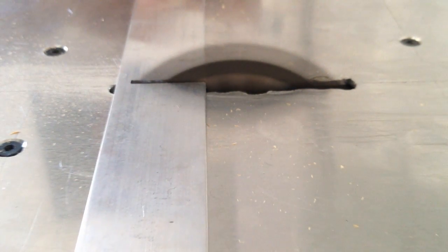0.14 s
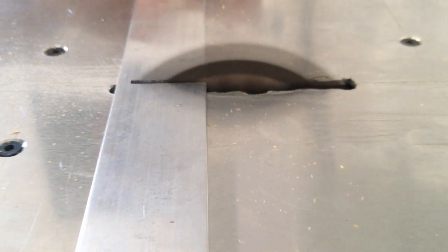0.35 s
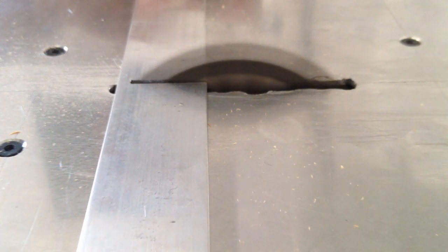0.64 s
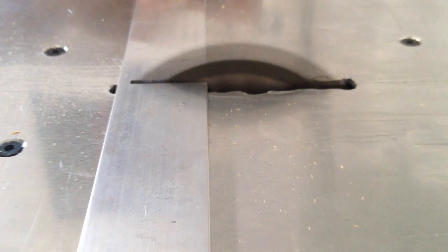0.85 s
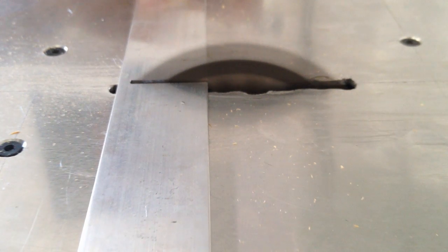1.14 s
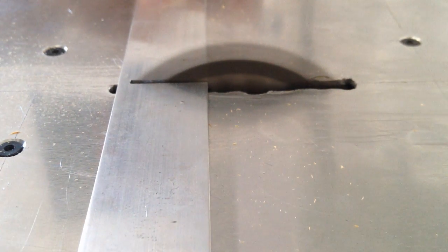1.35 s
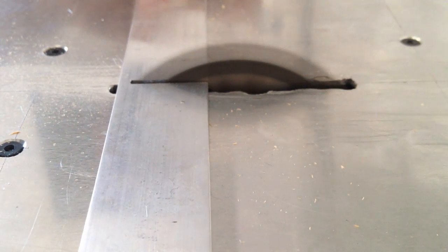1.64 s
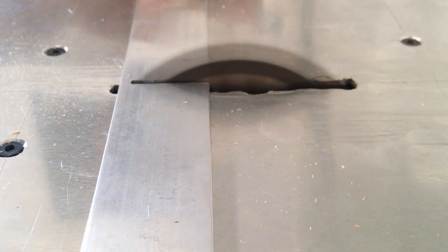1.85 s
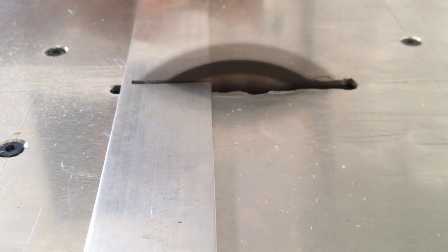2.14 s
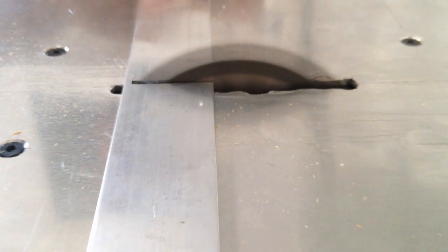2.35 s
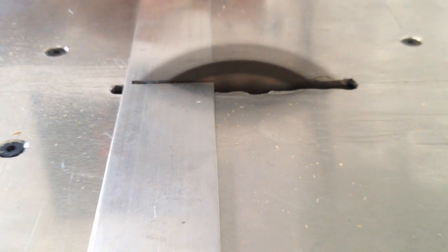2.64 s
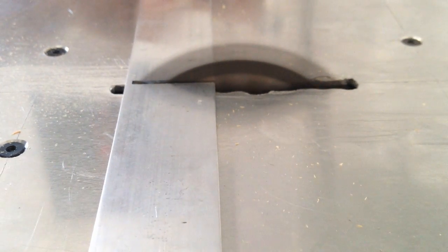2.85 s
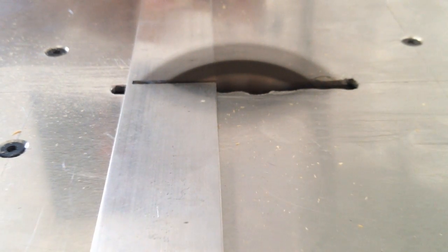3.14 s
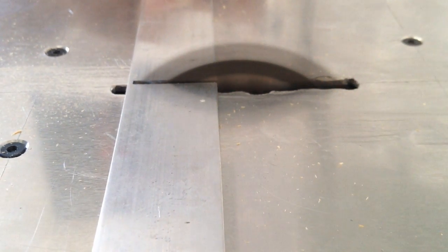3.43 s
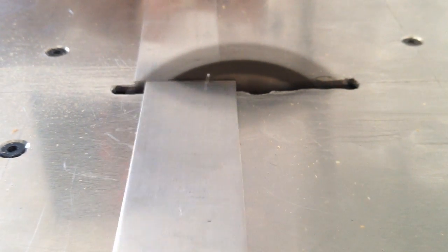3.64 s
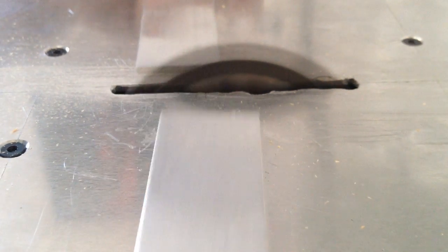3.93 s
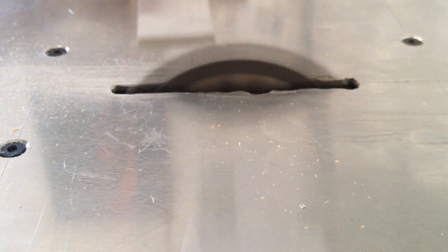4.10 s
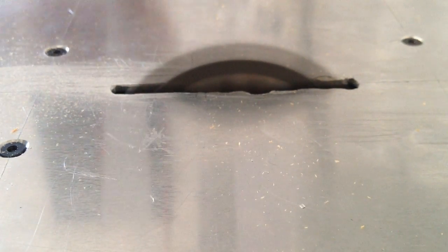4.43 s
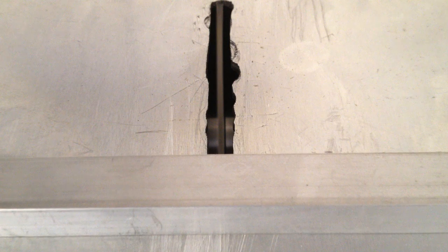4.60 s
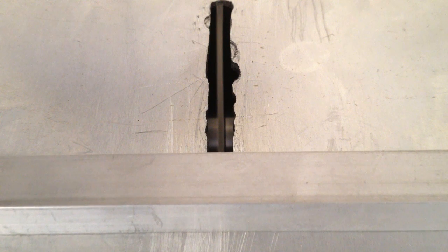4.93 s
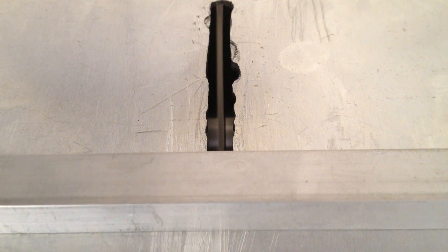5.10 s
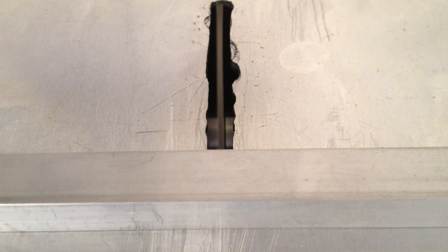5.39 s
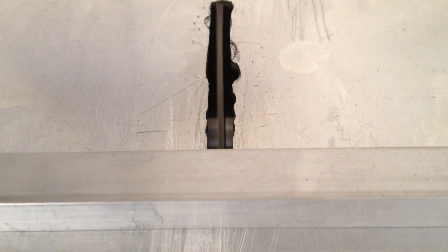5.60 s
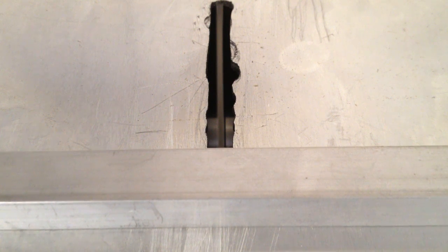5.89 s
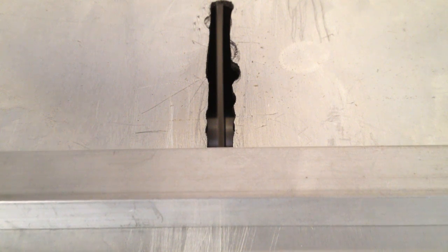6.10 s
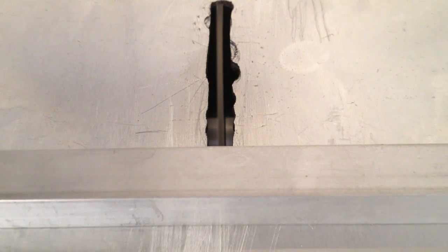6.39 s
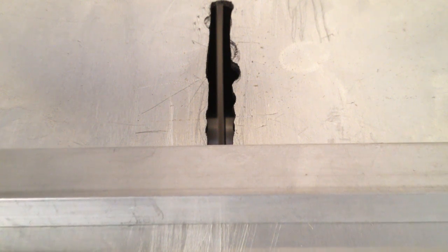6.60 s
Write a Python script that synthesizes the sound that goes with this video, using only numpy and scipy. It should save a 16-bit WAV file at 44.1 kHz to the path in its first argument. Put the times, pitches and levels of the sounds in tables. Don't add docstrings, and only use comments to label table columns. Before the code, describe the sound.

A small table saw rasps and screeches through thin aluminium in bursts, breaks free into a ringing whir, then starts a second, steadier shrill cut.

```python
import sys
import numpy as np
from scipy import signal
from scipy.fft import rfft, irfft, next_fast_len
from scipy.io import wavfile
from scipy.ndimage import uniform_filter1d, map_coordinates

SR = 44100
rng = np.random.default_rng(int(sys.argv[2]) if len(sys.argv) > 2 else 0)


def to_linear_factor(level_db):
    exponent = np.asarray(level_db, float) / 20
    return 10 ** exponent


def unload_audio(sound):
    columns = np.transpose(np.atleast_2d(sound))
    steps = np.round(np.clip(columns, -1, 1) * 32767)
    wavfile.write(sys.argv[1], SR, steps.astype(np.int16))


N = 297675

TEETH = 24
BREAK = 3.725
SECOND = 4.597
# centre f/Hz, width/Hz
BLADE_MODES = [(3640, 70), (4010, 130), (4690, 100), (4800, 90), (5890, 60), (6270, 80), (6480, 45),
               (7180, 50), (7610, 40), (7915, 40), (8375, 36), (6370, 70), (7760, 70), (8550, 120)]
BLADE_LEVELS = [
    [-12, -9, 0, 5, -12, 1.5, -9, -8, -8, 1, -5, -12, -14, -3],
    [-10, -8, -4, 1, -8, -3, -10, 0, -1, -1, 0, -3, -3, -4],
]
# centre f/Hz, width/Hz
CHIP_MODES = [(10565, 30), (10755, 25), (11215, 25), (11850, 180), (12400, 200), (13275, 20), (13500, 60),
              (14055, 26), (15100, 150)]
CHIP_LEVELS = [
    [-4, -16, -4.5, -10, -16, 0, -8, -3, -9.5],
    [-5, -12, -3.5, -19, -19, -7, -20, -1, -26],
]
# t/s, peak level/dB
SNATCHES = [(0.0338, -5), (0.0618, -7), (0.1311, -5), (0.1735, -5), (0.2014, -5), (0.2294, -6),
            (0.2708, -5), (0.3975, -3), (0.4803, -5), (0.4938, -3), (0.5801, 0), (0.7282, -3), (0.7831, -4),
            (0.839, -8), (0.9193, -4), (0.9477, -4), (1.0974, -5), (1.1248, -9), (1.2715, -9),
            (1.3219, -10), (1.4107, -8), (1.7469, -5), (1.7579, -1), (1.8347, -3), (2.0093, -10),
            (2.0986, -3), (2.2827, -5), (2.4014, -4), (2.4349, -10), (2.4798, -12), (2.5092, -11),
            (2.5247, -11), (2.5666, -13), (2.595, -11), (2.6244, -14), (2.6638, -10), (2.7452, -11),
            (2.7711, -6), (2.8898, -1), (2.9726, -2), (3.0145, -9), (3.0604, -9), (3.1428, -10),
            (3.2176, -13), (3.4111, -5), (3.4241, -3), (3.4366, -2), (3.5009, -5), (3.5269, -2),
            (3.5798, -3), (3.6386, 0)]
# t/s, peak level/dB
FURTHER_SNATCHES = [(1.774, -3), (1.787, -4), (2.113, -3), (2.154, -5), (2.226, -7), (2.374, -4),
                    (2.836, -3), (2.865, -1), (3.284, -14), (3.6062, -2), (4.135, -15)]


def unit(x):
    return x / np.sqrt(np.mean(np.abs(x) ** 2) + 1e-20)


def curves(rows):
    s, *cols = np.transpose(rows)
    return [np.interp(np.arange(N) / SR, s, c) for c in cols]


def by_cut(pair):
    return np.where(np.arange(N) > SECOND * SR, pair[1], pair[0])


def noise():
    return rng.standard_normal(N)


def wobble(rate):
    coarse = np.arange(0, N + 16, 16)
    knots = rng.standard_normal(int(N * rate / SR) + 4)
    return np.interp(np.arange(N), coarse, map_coordinates(knots, [coarse * rate / SR]))


def filtered(x, response):
    m = next_fast_len(N + SR // 2)
    return irfft(rfft(x, m) * response(np.fft.rfftfreq(m, 1 / SR)), m)[:N]


def coloured(x, points):
    f, v = np.transpose(points)
    return unit(filtered(x, lambda hz: to_linear_factor(np.interp(np.log(hz + 1), np.log(f + 1), v))))


def ringing(x, modes):
    def response(f):
        total = 0
        for k, (centre, width, db) in enumerate(sorted(modes)):
            mode = 1j * f * width / (centre * centre - f * f + 1j * f * width)
            total = total + (-1) ** k * to_linear_factor(db) * mode
        return total
    return unit(filtered(x, response))


def rim(turns, changes, weight):
    size, wear = 2048, np.arange(N) * changes / SR
    rough = rfft(rng.standard_normal((int(wear[-1]) + 2, size)))
    shapes = irfft(rough * weight(np.arange(size // 2 + 1)), size)
    row, place = wear.astype(int), (turns % 1 * size).astype(int)
    new = wear % 1 * np.pi / 2
    return unit(np.cos(new) * shapes[row, place] + np.sin(new) * shapes[row + 1, place])


def shaft():
    # from t/s, to t/s, speed left/(turns/s)
    loads = [(0, .3, 71.3), (.3, .5, 73), (.5, 1.08, 72.9), (1.71, 1.85, 76.7), (1.85, 1.95, 74.8),
             (2.03, 2.15, 73.7), (2.15, 2.26, 68.3), (2.26, 2.45, 65.4), (2.85, 3.08, 72.5),
             (3.4, 3.73, 72.5), (4.596, 4.6, 80.5), (4.6, 4.68, 79.9), (4.81, 4.95, 78.1),
             (4.95, 5.11, 78.5), (5.11, 5.23, 76.1), (5.68, 5.87, 81), (5.87, 6.18, 82.8), (6.18, 6.34, 81),
             (6.43, 6.59, 80.6), (6.59, 6.69, 79)]
    first_turns, free_turns, run_up_s = 72, 85.5, .43
    t, speed = np.arange(N) / SR, np.full(N, 1. * first_turns)
    for start, end, left in loads:
        a, b, fade = int(start * SR), int(end * SR), np.exp((start - end) / run_up_s)
        goal = (left - speed[a] * fade) / (1 - fade)
        speed[a:b] = goal + (speed[a] - goal) * np.exp((start - t[a:b]) / run_up_s)
        speed[b:] = free_turns + (left - free_turns) * np.exp((end - t[b:]) / run_up_s)
    return speed


def feed():
    # t/s, steady cut level/dB, chip share/dB, freedom of the blade to sing/dB
    pressure = [(0, -17.5, -1, -37), (.45, -17.5, 1, -40), (.55, -16.5, 1, -27), (1.2, -25, 1, -35),
                (1.98, -30, 2, -34), (2.47, -24.5, 3.5, -44), (3.39, -30, -3, -37), (3.45, -20, -4, -38),
                (3.71, -18, -1, -47), (3.76, -29, -7, -32), (3.95, -32, -22, -28.5), (4.595, -40, -24, -29),
                (4.6, -15.5, -3, -45), (5.2, -16, -6.5, -44), (5.4, -16, -1, -22), (6.2, -16.5, -2, -21),
                (6.43, -20.5, -4, -28), (6.5, -16, -4, -26)]
    # peak t/s, peak level/dB, time to rise 10 dB/s, time to fall 10 dB/s
    shoves = [(.28, -20, .04, .04), (.5, -18, .04, .06), (.59, -15, .08, .1), (.81, -16, .1, .02),
              (1.02, -14, .16, .16), (1.43, -27, .05, .05), (1.775, -13.5, .08, .03), (1.85, -14, .06, .09),
              (2.11, -14, .07, .16), (2.22, -18, .1, .1), (2.33, -14, .1, .1), (2.53, -27, .05, .05),
              (2.7, -23, .1, .03), (2.855, -13, .07, .12), (2.985, -24, .015, .1), (3.22, -27, .03, .04),
              (3.43, -18, .01, .09), (3.56, -18, .06, .08), (3.69, -12, .15, .03), (3.82, -27, .1, .06),
              (4.15, -34, .04, .04), (4.63, -18, .03, .08), (4.8, -19, .08, .1), (5.09, -21, .04, .15),
              (5.66, -17, .05, .15), (6, -21, .1, .1), (6.73, -19, .05, .1)]
    whole, t = np.arange(N) / SR, np.arange(0, N, 32) / SR
    steady_db, chip_db, free_db = curves(pressure)
    power = 0
    for s, db, rise, fall in shoves:
        away = np.where(t < s, (s - t) / rise, (t - s) / fall)
        power = power + to_linear_factor(2 * db - 20 * away)
    cut_db = 10 * np.log10(to_linear_factor(2 * steady_db) + np.interp(whole, t, power))
    lift_from_s, lift_to_s = 3.225, 3.283
    lift = np.clip((whole - lift_from_s) / (lift_to_s - lift_from_s), 0, 1)
    lift_db = -14 * lift * (whole < lift_to_s)
    fizz_db = lift_db + chip_db - .4 * (cut_db - steady_db)
    return cut_db + .3 * lift_db, fizz_db, free_db + 2.5 * wobble(6)


def landed(turns):
    at = np.sort([round(s * SR) for s, _ in SNATCHES + FURTHER_SNATCHES])
    slip = np.unwrap(-2 * np.pi * turns[at]) / (2 * np.pi)
    first = np.arange(N) < SECOND * SR
    return turns + first * (np.interp(np.arange(N), at, slip) - np.floor(slip.min()))


def bite(turns):
    # t/s, level on the run-out/dB
    proud = [(0, 1), (.45, 1), (.56, -3), (.85, -1), (1, -4), (1.15, 0), (1.68, -2), (1.74, 5), (1.8, 4),
             (1.84, -1), (2.05, 2), (2.4, 3), (3.45, 3), (3.6, 1), (3.66, -4), (4.6, 0)]
    depth = by_cut((1.65, 1.35)) * to_linear_factor(curves(proud)[0] + 1.3 * wobble(8))
    count = int(turns[-1]) + 3
    loose = np.arange(N) < SECOND * SR
    turns = turns + 1 + loose * .04 * wobble(45)
    which = turns.astype(int)
    chance = rng.standard_normal(count)[which]
    sway = (-1.) ** which
    shape = to_linear_factor(2.2 * (-0.7 + loose) * chance + .8 * sway) * np.exp(-np.clip(depth, 0, 8) * (turns % 1))
    landing_s = .0022
    shape = uniform_filter1d(shape, int(landing_s * SR) + 1)
    return shape / np.sqrt(np.abs(uniform_filter1d(shape ** 2, size=2400)))


def table(speed, turns, force, cut_db):
    # centre f/Hz, width/Hz, level/dB
    top_modes = [(205, 12, 1.5), (357.4, 10, -11), (865.5, 22.8, 3.5), (912, 36, 0), (1071, 46, -18)]
    # t/s, level/dB
    looseness = [(0, 5), (.3, 2), (.6, 0), (1.1, 1), (1.5, -2), (2.2, 0), (2.5, 4), (2.75, 2), (3.05, -4),
                 (3.6, -3), (3.8, 0), (6.75, 0)]
    t = np.arange(N) / SR
    shake = to_linear_factor(by_cut((-28.5, -36)) + cut_db + 18)
    shake += to_linear_factor(by_cut((-37, -43)) + 1.6 * (speed - 83))
    returns = by_cut((0, .75))
    steady = np.sqrt(returns) * rim(turns, 3, lambda k: k > 0)
    push = (0.2 + force) * (np.sqrt(1 - returns) * noise() + steady)
    drum_db = -6.5 + (t > BREAK) * (by_cut((3, 1.5)) + 2.4 * (speed - 82))
    drum = to_linear_factor(drum_db) * ringing(push, top_modes[:1])
    upper = filtered(ringing(push, top_modes[1:]), lambda hz: 1 - .6 / (1 + ((hz - 560) / 170) ** 4))
    return shake * to_linear_factor(curves(looseness)[0] + 1.6 * wobble(9) - 4) * (drum + upper)


def knocks(force):
    # t/s, level/dB, length/s
    knock_times = [
        (.53, -66, .04),
        (.71, -58, .03),
        (1.75, -60, .05),
        (1.87, -58, .04),
        (2.18, -48, .02),
        (2.38, -38, .06),
        (2.895, -37, .015),
        (3.6, -36, .05),
        (3.66, -33, .11),
    ]
    # f/Hz, level/dB per Hz
    knock_colour = [(25, -2), (60, -8), (150, -4.5), (400, -5.5), (1200, -7), (3000, -10)]
    t, edge_s = np.arange(0, N, 32) / SR, .025
    bumps = [db - 20 * np.clip(np.abs(t - s) - length / 2, 0, None) / edge_s
             for s, db, length in knock_times]
    knock_db = np.interp(np.arange(N) / SR, t, np.max(bumps, axis=0))
    rattle_db = -69 + 3 * wobble(7)
    gain = to_linear_factor(1.2 * (np.maximum(knock_db, rattle_db) + 43.5) - 28)
    return gain * coloured(force * noise(), knock_colour)


def idle_air(speed):
    # f/Hz, level/dB per Hz
    air_colour = [(35, -68), (60, -44), (206, -1.5), (723, 2), (892, 6), (1000, 12), (1970, 14), (2110, 8),
                  (2480, 29), (3360, 26.5), (3700, 19), (4200, 24), (5400, 21.5), (6440, 19), (14500, 5),
                  (15600, -48)]
    return to_linear_factor(-35.5 + .4 * (speed - 82)) * coloured(noise(), air_colour)


def blows(turns, force, scatter_db, uneven):
    heights = [11, 10, 2, -9, -9, 5, 6, -4, -10, 0, 1, -9, -7, -2, -8, -10, -3, -5, -10, -7, -2, -9, -10,
               -3]
    steps = np.arange(1, int(turns[-1] * TEETH))
    tooth = steps % TEETH
    spacing = .05 * rng.standard_normal(TEETH)
    at = np.interp(steps + spacing[tooth], turns * TEETH, np.arange(N))
    size_db = uneven * np.array(heights)[tooth] + scatter_db * rng.standard_normal(len(steps))
    size = to_linear_factor(size_db) * force[at.astype(int)]
    taps = at.astype(int)[:, None] + np.arange(-7, 9)
    off = taps - at[:, None]
    kernel = np.sinc(off) * np.cos(off * np.pi / 16) ** 2
    return np.bincount(np.clip(taps, 0, N - 1).ravel(), (size[:, None] * kernel).ravel(), N)


def cut(turns, force, cut_db, fizz_db):
    # f/Hz, level/dB per Hz
    tear_colours = [
        [(150, -49), (300, -17), (685, -16), (850, -6), (1010, -15), (1350, -18), (1580, -25), (1820, -1.5), (2650, -13), (3380, -4), (3900, -13), (4800, -1), (5370, -7), (6250, -5), (8240, -8.5), (9600, -10), (12500, -43), (21100, -120)],
        [(150, -39), (250, -30), (433, -40), (717, -29), (901, -8), (1050, -12), (1250, -30), (1650, -30), (1900, -6), (2920, -12), (3960, -6), (4300, -15), (4800, -4), (5290, -7), (6100, 0), (7750, -4), (8600, -4), (9600, -6), (12500, -44), (21100, -120)],
    ]
    # centre f/Hz, width/Hz, level/dB
    stock_modes = [
        [(340, 66, -8), (900, 200, -8.5), (1880, 250, -5), (3370, 300, -2.5), (4850, 330, -0.5), (6250, 500, -8), (8300, 1200, -9)],
        [(151, 30, -20), (600, 100, -28), (1057, 100, -6), (1876, 156, -2), (2610, 90, 1), (4000, 350, -14), (6100, 600, 0), (7700, 900, 2)],
    ]
    # f/Hz, level/dB per Hz
    chip_colours = [
        [(5760, -60), (9800, -16), (10300, -3.5), (11100, -6.5), (13600, 4), (15400, -9)],
        [(5760, -14), (9800, -13), (10800, -9), (12700, -17), (13700, 1), (15400, -16)],
    ]
    # blows/dB, tearing/dB, blade ring/dB, high ring/dB, tooth scatter/dB, share of the ring
    mixes = [
        (-12, -6.5, -2.5, -2.5, 4, .2, .45, .75),
        (-7, -7, -6.5, -1.5, 1.4, .3, .65, .6),
    ]
    rim_changes = 14, 3.5
    hollows = 0, .65
    second, out = np.arange(N) > SECOND * SR, np.zeros(N)
    for i, on in enumerate((~second, second)):
        blow_db, tear_db, ring_db, shine_db, scatter_db, struck, returns, uneven = mixes[i]

        def stock_response(hz):
            upper = hollows[i] / (1 + ((hz - 1420) / 280) ** 4)
            lower = hollows[i] / (1 + ((hz - 480) / 300) ** 4)
            return (1 - upper - lower) / (1 + (hz / 9200) ** 8)

        burr = np.sqrt(returns) * rim(turns, rim_changes[i], lambda k: k < 130)
        burr += np.sqrt(1 - returns) * noise()
        rasp = force * to_linear_factor(.4 * scatter_db * wobble(400))
        teeth = unit(blows(turns, force ** 0.49, scatter_db, uneven))
        hits = filtered(ringing(teeth, stock_modes[i]), stock_response)
        body = to_linear_factor(blow_db) * hits + to_linear_factor(tear_db) * coloured(rasp * burr, tear_colours[i])
        chips = to_linear_factor(fizz_db - 5) * coloured(rasp ** .5 * noise(), chip_colours[i])
        out += on * to_linear_factor(cut_db) * (body + chips)
        shaken = to_linear_factor(ring_db) * (struck * teeth + (1 - struck) * rasp * burr)
        sprayed = to_linear_factor(shine_db + fizz_db) * rasp * noise()
        for drive, modes, levels in ((shaken, BLADE_MODES, BLADE_LEVELS[i]),
                                     (sprayed, CHIP_MODES, CHIP_LEVELS[i])):
            drive = on * to_linear_factor(cut_db) * drive
            ring = ringing(drive, [(*mode, db) for mode, db in zip(modes, levels)])
            out += on * np.std(drive) * filtered(ring, lambda hz: 1 / (1 + (2300 / (hz + 1)) ** 4))
    return out


def disc(turns, force, cut_db, free_db):
    # rest f/Hz, nodal diameters, beat of the twin wave f/Hz
    waves = [(1889, 3, 11), (1889, -3, 11), (3079, 4, 7), (3079, -4, 7), (4898, 0, 13), (4973, 0, 9),
             (5722, 6, 9), (5915, 6, 14), (7154, 0, 10), (7564, 0, 12), (7907, 0, 15), (4468, 0, 8)]
    # free level/dB, ring after the break/dB, first cut level/dB, second cut level/dB
    wave_drives = [(0, -60, -23, -34), (-14, -46, -23, -36), (0, -46, -14, -26), (-13, -46, -30, -40),
                   (-16, -23.5, -20, -30), (-18, -28, -22, -32), (-13, -35, -22, -32), (-16, -38, -24, -32),
                   (-15, -40, -32, -34), (-17, -38, -32, -28), (-21, -33, -28, -28), (-16, -40, -30, -34)]
    whole, out, step = np.arange(N) / SR, np.zeros(N), 16
    t = whole[::step]
    slow = lambda rate: wobble(rate)[::step]
    for (hz, nodes, beat), (air_db, left_db, first_db, second_db) in zip(waves, wave_drives):
        shake = rng.standard_normal(len(t)) + 1j * rng.standard_normal(len(t))
        drive_db = cut_db[::step] + np.where(t > SECOND, second_db, first_db)
        drive = force[::step] * to_linear_factor(drive_db) * shake
        keep = np.exp(-np.pi * 18 * step / SR)
        swing = signal.lfilter([np.sqrt(1 - keep ** 2)], [1, -keep], drive)
        free = to_linear_factor(free_db[::step] + air_db - 16 * (t > SECOND))
        free += (t > BREAK) * (t < SECOND) * to_linear_factor(left_db - 60 * np.abs(t - BREAK) / 1.7)
        twin = 1 + .45 * to_linear_factor(3 * slow(2)) * np.exp(2j * np.pi * beat * t + 2j * slow(3))
        swing += free * twin * to_linear_factor(2.5 * slow(6)) * np.exp(.4j * slow(8))
        phase = 2 * np.pi * (hz * whole + nodes * turns)
        out += np.interp(whole, t, swing.real) * np.cos(phase)
        out -= np.interp(whole, t, swing.imag) * np.sin(phase)
    return out


def motor(speed, turns, force, cut_db):
    shaft_orders = 11, 13, 36
    order_levels = [-15.5, -2.5, 5]
    # from t/s, to t/s
    dropouts = [
        (4.88, 5.16),
        (6.7, 6.8),
    ]
    t = np.arange(N) / SR
    second = t > SECOND
    dropped = sum((t > a) * (t < b) for a, b in dropouts)
    even = 1 - uniform_filter1d(dropped * (1 - to_linear_factor(-24)), size=2000)
    whine_hz, width_hz = 1780, 22
    tuned = np.where(second, 1, 1 / (1 + np.exp((whine_hz - TEETH * speed) / width_hz)))
    air_whine = to_linear_factor(-46 + 5 * (speed - 83.5))
    cut_whine = to_linear_factor(by_cut((-27, -29.5)) + .8 * (cut_db + 18)) * even * tuned * force ** by_cut((.25, .7))
    whine = np.where((t > BREAK) * (t < SECOND), air_whine, cut_whine)

    def tone(k, db):
        return to_linear_factor(db + 4.5 + 1.1 * wobble(15)) * np.sin(2 * np.pi * k * turns + 0.54 * wobble(25))

    order_db = by_cut((-47, -39)) + by_cut((1.5, -1.2)) * (speed - 80)
    lines = np.zeros(N)
    for k, db in zip(shaft_orders, order_levels):
        lift = 1 + by_cut((24, 5)) / (1 + ((k * speed - 912) / 17) ** 4)
        lines += lift * tone(k, order_db + db - 18 * (k > TEETH) * second)
    octave_db = by_cut((-7, -32)) - 4.0 - 12 * second
    return lines + whine * (tone(TEETH, 0) + tone(2 * TEETH, octave_db))


def unbalance(speed, turns):
    level_db = by_cut((-54, -60)) + by_cut((3.5, .8)) * (speed - 82) - 3.5
    return to_linear_factor(level_db) * np.sin(2 * np.pi * turns)


def thud(turns, cut_db):
    # f/Hz, level/dB per Hz
    thud_colour = [(120, -40), (170, -14), (300, -24), (600, -7), (1050, 0), (1350, -13), (1600, -19),
                   (2600, -8), (3200, -40)]
    once = np.diff(np.floor(turns), prepend=turns[0] // 1)
    return to_linear_factor(by_cut((-26, -21)) + cut_db) * coloured(once * to_linear_factor(1.2 * wobble(40)), thud_colour)


def snatch(cut_db):
    # f/Hz, level/dB per Hz
    catch_colour = [(300, -30), (900, -14), (1400, -16), (1900, 0), (2600, -8), (4500, 0), (6300, -6),
                    (9500, -12), (13000, -10), (16000, -30)]
    t60_s, rise_s = .022, .0004
    shape, t = np.zeros(N), np.arange(SR // 20) / SR
    for s, db in SNATCHES + FURTHER_SNATCHES:
        start, peak = round(s * SR), to_linear_factor(db - 5.5)
        covered = to_linear_factor(2 * (cut_db[start] + 5))
        over = np.sqrt(max(peak ** 2 - covered, .1 * peak ** 2))
        shape[start:][:len(t)] += over * to_linear_factor(-60 * t / t60_s) * (1 - np.exp(-t / rise_s))
    return shape * coloured(noise(), catch_colour)


def afterglow():
    t = np.arange(N) / SR
    level = (t > BREAK) * (t < SECOND) * (to_linear_factor(-28 - 60 * np.abs(t - BREAK) / 1.1) + to_linear_factor(-59))
    levels = BLADE_LEVELS[0] + CHIP_LEVELS[0]
    modes = [(hz, 0.56 * width, db) for (hz, width), db in zip(BLADE_MODES + CHIP_MODES, levels)]
    return level * to_linear_factor(2.5 * wobble(8.2)) * ringing(noise(), modes)


def shimmer():
    # f/Hz, level/dB
    free_modes = [(8360, -52), (8920, -59), (9006, -58), (9087, -59), (9324, -54), (9765, -62),
                  (10110, -58), (10271, -60), (10503, -61), (10740, -61), (11020, -66), (13259, -69),
                  (14395, -64), (14723, -64)]
    t, t60_s, width_hz = np.arange(N) / SR, 1.5, 25
    level = (t > BREAK) * (t < SECOND) * (to_linear_factor(-33 - 60 * np.abs(t - BREAK) / t60_s) + to_linear_factor(-47))
    modes = [(hz, width_hz, db) for hz, db in free_modes]
    return level * to_linear_factor(2 * wobble(12)) * ringing(noise(), modes)


def slide():
    # f/Hz, level/dB per Hz
    slide_colour = [(90, -30), (130, 2), (300, -4), (600, 0), (1300, -3), (2000, -8), (2600, -40)]
    t, start_s, rise_s = np.arange(N) / SR, 4.05, .3
    swell = np.clip((t - start_s) / rise_s, 0, 1) * (t < SECOND)
    return to_linear_factor(-45) * swell * coloured(noise(), slide_colour)


def grind(turns, force, cut_db):
    # shaft order, spread/orders, level/dB
    clusters = [
        [(13, .6, -11), (49.7, 2, 0), (55.5, 1.2, -5)],
        [(73, 3, -18), (97, 2, 0), (103, 2, -6)],
        [(22.3, .7, -4), (24, .7, -2), (25.2, .6, -2)],
    ]
    # t/s, middle level/dB, upper level/dB, rhythm level/dB
    cluster_levels = [(4.6, -8, -8, -17), (4.85, -10, -5, -20), (4.95, -17, -4, -21), (5.2, -13, -5, -20),
                      (5.6, -15, -6, -14), (5.72, -14, -15, -14), (6.1, -15, -11, -13),
                      (6.35, -20, -12, -14), (6.55, -20, -6, -13), (6.75, -17, -6, -12)]
    out = np.zeros(N)
    for cluster, level_db in zip(clusters, curves(cluster_levels)):
        def weight(k):
            return sum(to_linear_factor(db) / (1 + ((k - order) / spread) ** 2) for order, spread, db in cluster)
        out += to_linear_factor(level_db) * rim(turns, 6, weight)
    return by_cut((0, 1)) * to_linear_factor(cut_db) * force ** .5 * out


def scene():
    speed = shaft()
    cut_db, fizz_db, free_db = feed()
    turns = np.cumsum(speed) / SR
    turns -= turns[round(4.6005 * SR)] % 1 - 1
    force = bite(landed(turns))
    saw = table(speed, turns, force, cut_db) + idle_air(speed)
    saw += cut(turns, force, cut_db, fizz_db)
    saw += disc(turns, force, cut_db, free_db - 0.5)
    saw += motor(speed, turns, force, cut_db)
    saw += thud(turns, cut_db) + snatch(cut_db)
    saw += afterglow() + shimmer() + slide()
    saw += grind(turns, force, cut_db)
    thin = filtered(saw, lambda hz: 1 / (1 + (140 / (hz + 1)) ** 4))
    return (thin + knocks(force) + unbalance(speed, turns))[None]


def gated(x, below_db, per_octave_db):
    hz, _, z = signal.stft(x, SR, nperseg=1024)
    hz = hz[:512, None]
    power = uniform_filter1d(np.abs(z[:512]) ** 2, size=7, axis=1)
    band = np.repeat(power.reshape(128, 4, -1).mean(axis=1), 4, axis=0)
    around = uniform_filter1d(power, size=40, axis=0)
    limit_db = below_db + per_octave_db * np.log2(hz / 8000 + .01)
    z[:512] *= np.where((band < around * to_linear_factor(2 * limit_db)) & (hz > 2300), .03, 1)
    return signal.istft(z, SR, nperseg=1024)[1][:N]


def roll_off(x):
    return signal.sosfilt(signal.butter(12, 16500, fs=SR, output="sos"), x)


def record(dry):
    thin = filtered(dry[0], lambda hz: (hz < 15380) * hz ** 2 / (hz ** 2 + 55 ** 2))
    clipped = thin / (1 + np.abs(thin / 1.05) ** 8) ** (1 / 8)
    mix = gated(clipped, below_db=-8.3, per_octave_db=4)[None]
    return roll_off(mix)


dry = scene()
out = record(dry)
unload_audio(out)
```